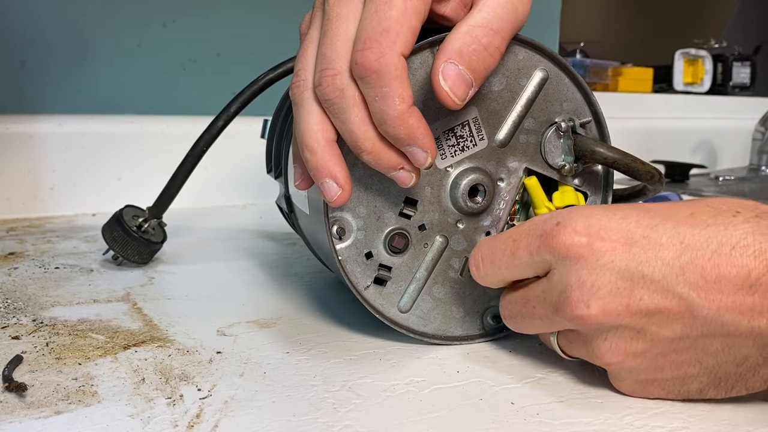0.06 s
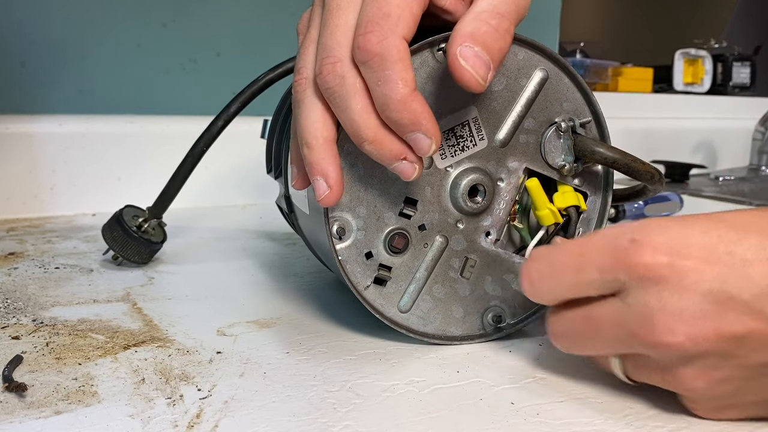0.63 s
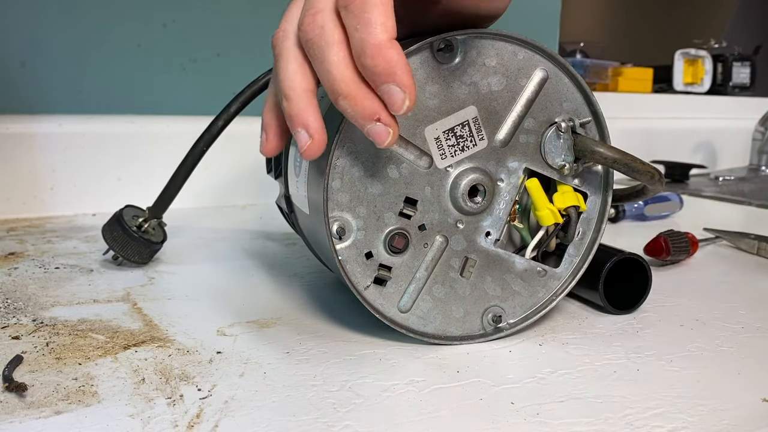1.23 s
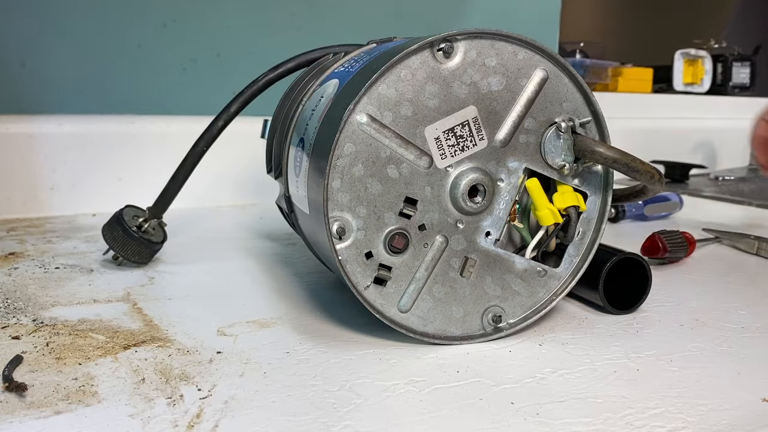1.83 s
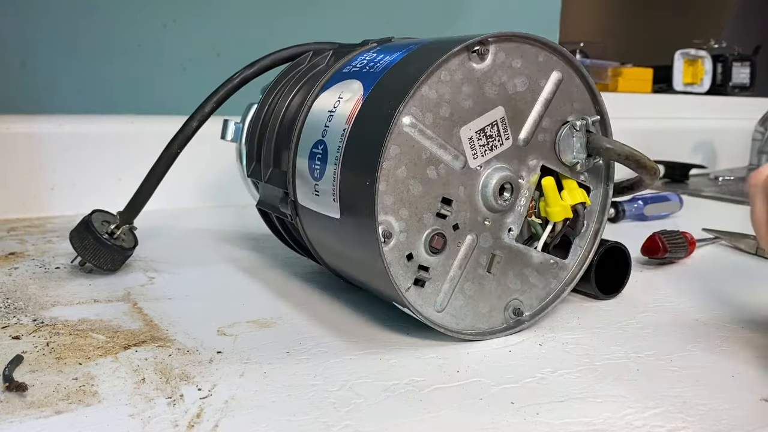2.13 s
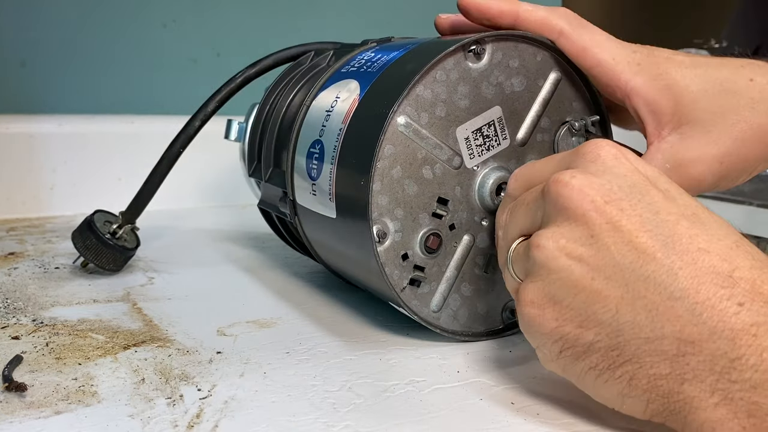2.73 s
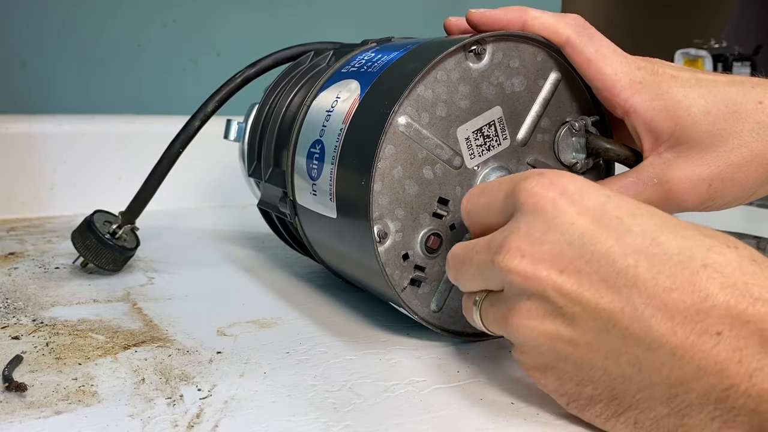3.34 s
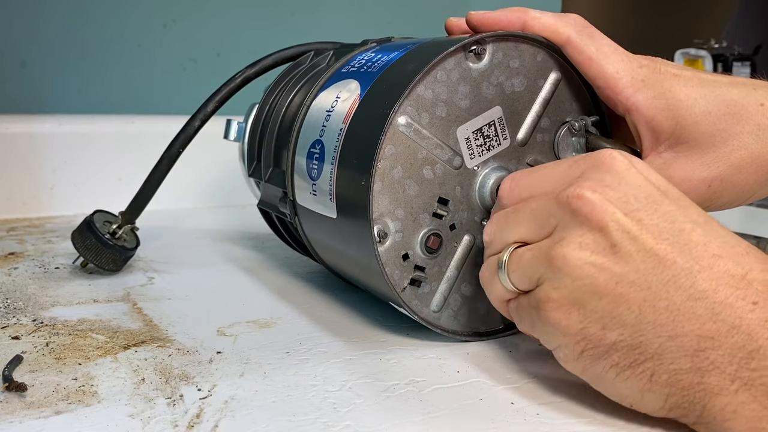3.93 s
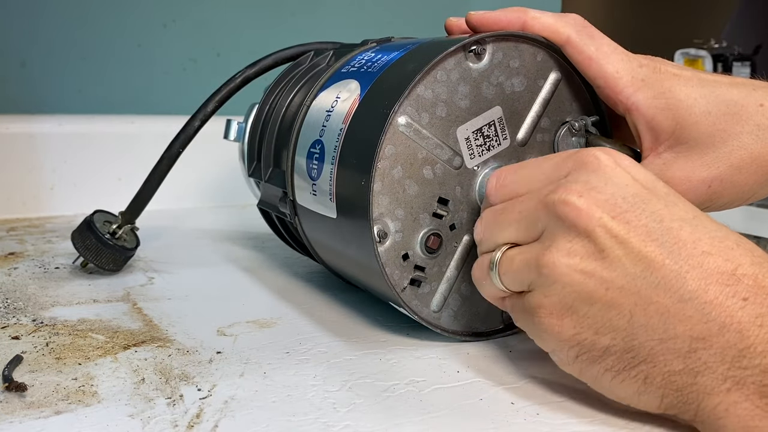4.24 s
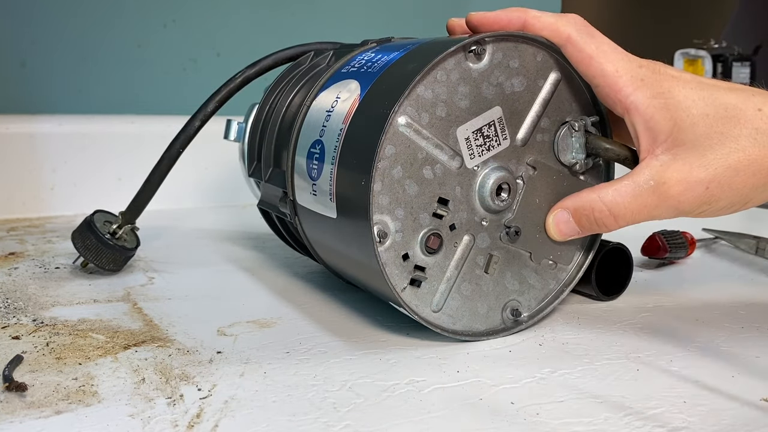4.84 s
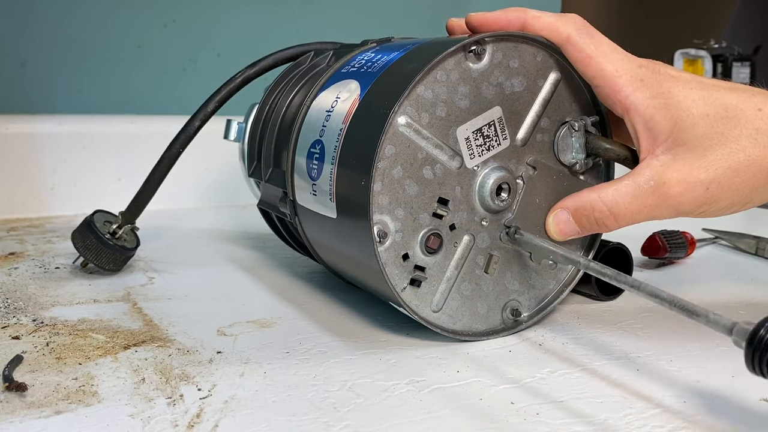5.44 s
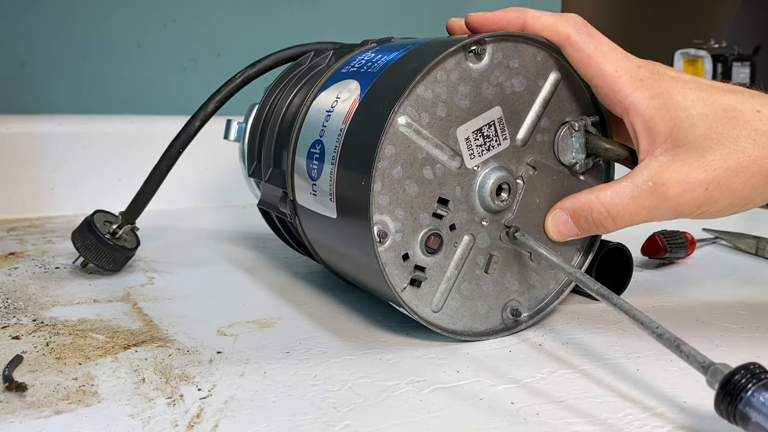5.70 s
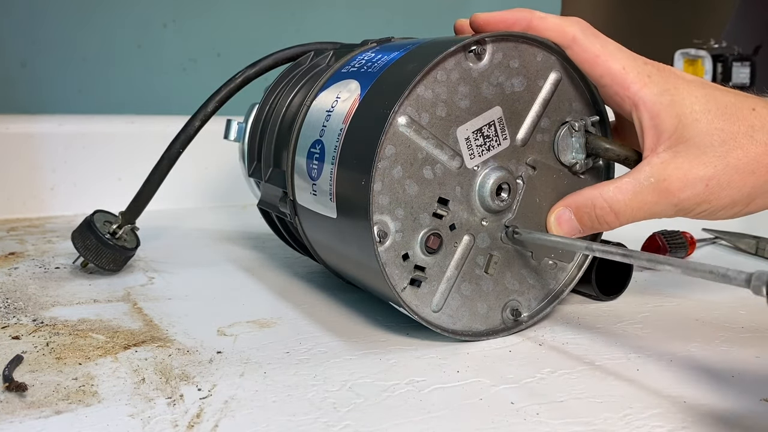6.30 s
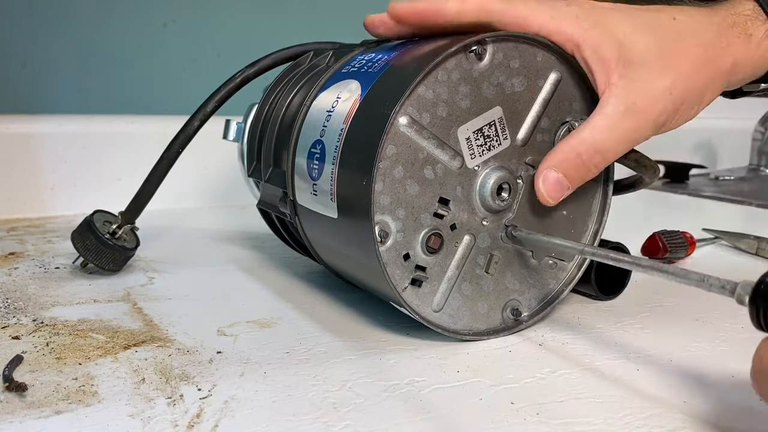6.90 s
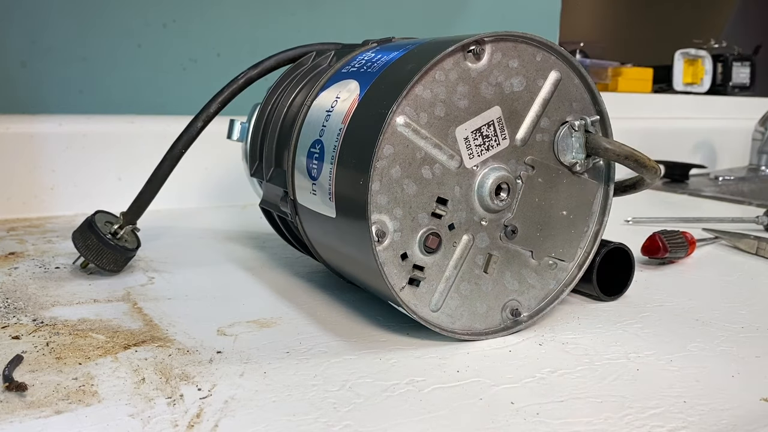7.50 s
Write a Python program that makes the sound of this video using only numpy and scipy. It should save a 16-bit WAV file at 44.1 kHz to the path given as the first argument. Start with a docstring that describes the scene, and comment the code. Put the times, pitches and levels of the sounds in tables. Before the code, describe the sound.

An electric motor knocks heavily on a countertop, then a small metal cover clicks on and a screwdriver ticks and scrapes.

```python
"""A countertop in a small room, a stereo microphone close to an electric motor lying on it.
Wires are pushed into the motor's end compartment; let go, it rocks with heavy knocks that boom in the
counter. A small sheet-metal cover is picked up, clicked into place and screwed down, ringing the end
plate. Off to the side, cover and screwdriver clatter. Behind it all lies a low rumble or a faint hum."""
import sys
import numpy as np
from scipy import signal
from scipy.fft import rfft, irfft
from scipy.io import wavfile
from scipy.ndimage import uniform_filter1d

SR = 44100
rng = np.random.default_rng(int(sys.argv[2]) if len(sys.argv) > 2 else 0)


def digitize_waveform(pressure):
    """Quantize a signal to 16-bit integers and store it at the path in sys.argv[1].

    Rows of a 2-D input are taken as channels; values are limited to [-1, 1].
    """
    field = np.atleast_2d(pressure).T
    bounded = np.clip(field, -1, 1)
    quanta = np.round(bounded * 32767).astype(np.int16)
    wavfile.write(sys.argv[1], SR, quanta)


N = 333396
RING_SAMPLES, ONSET_SAMPLES = int(.6 * SR), int(.03 * SR)
TIME, RING_TIME = np.arange(N) / SR, np.arange(RING_SAMPLES) / SR
LEFT_RIGHT = np.array([[1], [-1]])


def undb(db):
    """Decibels to gain."""
    return 10 ** (np.asarray(db) / 20)


def unit(x):
    """Scale to rms 1."""
    return x / np.sqrt(np.mean(x ** 2))


def fade(t60):
    """Exponential decay, 60 dB in t60 seconds."""
    return np.exp(-np.log(1000) * RING_TIME / max(t60, 1e-3))


def rise(build_s):
    """Onset that climbs towards 1 with time constant build_s."""
    return 1 - np.exp(-RING_TIME / build_s)


def gate(start_s, end_s, attack_s, release_s):
    """Envelope that swells from start_s, holds until end_s and dies away."""
    swell = 1 - np.exp(-np.maximum(TIME - start_s, 0) / attack_s)
    return swell * np.exp(-np.maximum(TIME - end_s, 0) / release_s)


def add(track, s, sound):
    """Mix a sound into the track at time s."""
    start = max(int(s * SR), 0)
    track[:, start:start + sound.shape[1]] += sound[:, :N - start]


def noise(colour, width, size=RING_SAMPLES, ripple_db=0):
    """Stereo noise with a (Hz, dB) spectrum, rippled by a struck object's many narrow resonances."""
    hz, db = np.transpose(colour)
    f = np.maximum(np.fft.rfftfreq(size, 1 / SR), 1)
    grid = np.geomspace(200, SR / 2, num=260)
    ripple = ripple_db * np.interp(f, grid, rng.standard_normal(len(grid)))
    spectrum = undb(np.interp(np.log(f), np.log(hz), db) + ripple)
    mid, side = rfft(rng.standard_normal((2, size))) * spectrum
    side = side * width * f ** 2 / (f ** 2 + 220 ** 2)  # long waves reach both capsules alike
    return unit(irfft(np.array([mid + side, mid - side]), size))


def ring(modes, detune, phase_spread, spot_db, t60_scale=1):
    """Struck modes; each blow lands on a new spot, and short waves reach the capsules out of phase."""
    out = 0
    for hz, db, t60 in modes:
        pitch, weight, skew = rng.standard_normal(3)
        skew = phase_spread * skew * hz / np.hypot(hz, 600)
        phase = 2 * np.pi * hz * (1 + detune * pitch) * RING_TIME + skew * LEFT_RIGHT
        gain = rng.choice([-1, 1]) * undb(db + spot_db * weight)
        out = out + gain * fade(t60 * t60_scale) * np.sin(phase)
    return out / np.sqrt(np.sum(undb(np.array(modes)[:, 1]) ** 2) / 2)


def radiate(x, lowest_hz):
    """An object gives off little sound at wavelengths much longer than itself."""
    return signal.sosfilt(signal.butter(2, lowest_hz, "high", fs=SR, output="sos"), x)


def set_bands(blow, edges_hz, levels_db):
    """Scale each band of a blow so that its first 30 ms have the given rms level."""
    out = 0
    for k, db in enumerate(levels_db):
        band = blow
        if k > 0:
            band = signal.sosfilt(signal.butter(4, edges_hz[k - 1], "high", fs=SR, output="sos"), band)
        if k < len(edges_hz):
            band = signal.sosfilt(signal.butter(4, edges_hz[k], fs=SR, output="sos"), band)
        out = out + band * undb(db) / np.sqrt(np.mean(band[:, :ONSET_SAMPLES] ** 2))
    return out


def reflect(x, db, t60, build_s):
    """Echoes of a sound from counter, housing and wall, different at each capsule."""
    echoes = rng.standard_normal((2, RING_SAMPLES)) * fade(t60) * rise(build_s)
    echoes = undb(db) * echoes / np.sqrt(np.sum(echoes ** 2) / 2)
    return signal.fftconvolve(x, echoes, axes=1)[:, :RING_SAMPLES]


def scatter(colour, db, t60, build_s):
    """The room's answer to a blow: a wide wash of noise that builds quickly and dies away."""
    return undb(db) * noise(colour, width=1, ripple_db=4) * fade(t60) * rise(build_s)


# spectrum of a low rumble: (frequency [Hz], level [dB])
RUMBLE_COLOUR = [(20, -0.5), (40, -32), (58, 9), (75, -4), (95, 6), (130, -8.5), (250, -9.5), (400, -16),
                 (800, -27), (2000, -65.5), (6000, -44), (16000, -56)]
def room_rumble():
    """Low room tone all around the microphone."""
    return undb(-50.5) * noise(RUMBLE_COLOUR, width=1, size=N)


# modes of the end plate, damped by the fingers: (frequency [Hz], level [dB], t60 [s])
PLATE_MODES = [(1150, 0, .02), (1275, 1, .022), (1465, -5, .018), (2410, -5, .018), (3080, -10, .018),
               (3830, -11, .02), (4860, -7, .02), (5060, -7, .032), (7520, -8, .03), (8100, -11, .025),
               (9600, -8, .025), (13500, -13, .018)]
# its dense upper modes: (frequency [Hz], level [dB])
PLATE_COLOUR = [(100, -17), (300, -4.5), (800, -7.5), (1300, -10), (2000, -4), (5000, 3.5), (6200, -2),
                (9500, -7), (11200, -7.5), (15000, -16)]
def plate_strike(levels_db, contact_t60, ring_db=-10.5, soft_s=.00028):
    """Metal meets the end plate close by: crack, brief ring, echoes. Levels are low, mid and high."""
    crack = noise(PLATE_COLOUR, width=.4, ripple_db=3) * fade(contact_t60)
    ring_gain = undb(ring_db) * min(contact_t60 / .012, 1) ** .5  # a brief contact rings less
    plate = ring_gain * ring(PLATE_MODES, detune=.025, phase_spread=.45, spot_db=2.5)
    direct = radiate((crack + plate) * rise(soft_s), lowest_hz=480)
    # small surfaces close by throw back mostly the short waves
    near = reflect(radiate(direct, lowest_hz=1500), db=-6, t60=.095, build_s=.003)
    far = reflect(direct, db=-26, t60=.45, build_s=.012)
    return set_bands(direct + near + far, edges_hz=[1900, 6500], levels_db=levels_db)


# a wire nut springing against the housing: (frequency [Hz], level [dB], t60 [s])
CLINK_MODES = [(1345, 0, .1), (1900, -7, .08), (2065, 0, .11), (2930, -8, .08), (3415, -7, .07)]
def wire_nut_clink():
    """A wire nut slips and sets the housing and the room ringing."""
    out = np.zeros((2, N))
    modes = ring(CLINK_MODES, detune=.002, phase_spread=.5, spot_db=1)
    housing = undb(-30) * radiate(modes, lowest_hz=500)
    tap = plate_strike([-37, -51, -74], contact_t60=.049, ring_db=-4.5)
    room = reflect(tap + housing / 2, db=-8, t60=.65, build_s=.0046)
    add(out, .0107, tap + housing + room)
    return out


# gritty slips of wire, cover and screw: (start [s], end [s], rate [1/s], level [dB])
GRIT_SPELLS = [(.04, .16, 34, -53.5), (2.36, 2.82, 15.4, -47), (3.38, 3.701, 42, -57),
               (3.78, 4.5, 21, -55.5), (5.68, 6.2, 70, -57), (6.2, 6.5, 36, -64), (6.5, 7.15, 24, -57.5)]
def grit():
    """Edges and threads catch and let go at random, each slip a tiny tick on the plate."""
    out = np.zeros((2, N))
    for start_s, end_s, rate, db in GRIT_SPELLS:
        slips = (rng.random(N) < rate / SR) * (TIME > start_s) * (TIME < end_s)
        slips = slips * undb(4.5 * rng.standard_normal(N).clip(-2, 2))
        tick = noise(PLATE_COLOUR, width=1, ripple_db=1.5) * fade(.014)
        tick = radiate(tick + reflect(tick, db=-4.5, t60=.089, build_s=.0023), lowest_hz=1990)
        out += undb(db) * signal.oaconvolve(slips[None], tick[:, :4 * ONSET_SAMPLES], axes=1)[:, :N]
    return out


def slipping(rate_hz, spread_db):
    """Gain that moves at random from one small slip to the next."""
    size = max(int(SR / rate_hz), 1)
    steps = undb(spread_db * rng.standard_normal(N // size + 1).clip(-2.3, 2.3))
    return unit(uniform_filter1d(steps.repeat(size), size=size)[:N])


# strokes of fingers, wires and housing: (start [s], end [s], rub level [dB], hiss level [dB])
STROKES = [(0.365, 0.385, -81, -63), (0.552, 0.723, -65.5, -51.5), (0.888, 1.004, -67.5, -60),
           (1.118, 1.245, -58, -87), (1.319, 1.443, -54, -60.5), (1.56, 2.102, -60.5, -72),
           (2.306, 2.477, -58, -58), (2.71, 2.83, -58, -70), (2.931, 3.02, -64, -68),
           (3.397, 3.588, -61, -62.5), (4.118, 4.345, -71, -65), (4.54, 4.657, -55, -58.5),
           (5.223, 5.255, -53.5, -90), (5.643, 5.83, -51.5, -64), (5.82, 6.16, -58.5, -59),
           (6.32, 6.48, -70, -83.5), (6.804, 7.03, -60.5, -64.5), (7.34, 7.378, -48, -51)]
def rubbing():
    """Skin, insulation and housing slide in tiny slips: each stroke is a dull rub and a fine hiss."""
    rub_gain, hiss_gain = undb(-71.5), undb(-85)  # hands never rest entirely
    for start_s, end_s, rub_db, hiss_db in STROKES:
        motion = gate(start_s, end_s, attack_s=.028, release_s=.025)
        rub_gain = rub_gain + undb(rub_db) * motion
        hiss_gain = hiss_gain + undb(hiss_db) * motion
    slips = slipping(rate_hz=900, spread_db=4.5) * slipping(rate_hz=120, spread_db=3.5)
    rub_colour = [(300, -30), (800, -7), (1300, 0), (2500, -5), (5000, -14), (8000, -24.5),
                  (16000, -57.5)]
    hiss_colour = [(1500, -27.5), (4500, 0), (7000, 2), (10000, 9), (12500, 0), (15500, 5.5)]
    rub = rub_gain * noise(rub_colour, width=.95, size=N)
    hiss = hiss_gain * noise(hiss_colour, width=.94, size=N)
    return slips * (rub + hiss)


# contacts on the end plate: (time [s], level [dB], brightness [dB], contact t60 [s])
PLATE_CLICKS = [(0.5233, -80, -22.5, .028), (2.3283, -38, 8, 0.002), (2.5799, -63.5, -2, 0.038),
                (2.6702, -62.5, 4, .055), (2.855, -40, -7, 0.0022), (2.8691, -28.5, -0.5, 0.0041),
                (2.924, -46.5, -8, 0.081), (2.929, -31.5, 3, 0.011), (3, -58, -3, 0.0094),
                (3.0832, -46.5, 4, 0.014), (3.0872, -46.5, -10.5, 0.0093), (3.1914, -53.5, -1.5, 0.047),
                (3.3961, -61.5, 0, 0.047), (3.4413, -54, -8, 0.05), (3.5229, -51, 0.5, 0.082),
                (3.5507, -54.5, 11.5, 0.02), (3.656, -66.5, -3.5, 0.043), (4.0518, -61, -1, 0.019),
                (4.8043, -58.5, -4, 0.086), (5.0672, -58.5, -5, 0.043), (5.2232, -54.5, -9.5, 0.072),
                (5.3147, -42, -3, 0.037), (5.3432, -39.5, -14, 0.0017), (5.53, -53.5, 0, 0.02),
                (5.7464, -50, -7.5, 0.023), (5.8023, -46.5, -4.5, 0.067), (5.873, -53.5, 2, 0.14),
                (5.9017, -52, -3, 0.15), (6.2036, -56.5, -7.5, 0.027), (6.5814, -47, -7.5, 0.023),
                (6.733, -46.5, -10.5, 0.0089), (6.7658, -53.5, -9, 0.055), (6.8365, -47, -7.5, 0.024)]
def clicks():
    """Cover, screw and screwdriver tip strike the plate; hard contacts tilt towards the treble."""
    out = np.zeros((2, N))
    for s, db, bright_db, contact_t60 in PLATE_CLICKS:
        add(out, s, plate_strike([db - 2 - bright_db, db, db - 1.5 + bright_db], contact_t60))
    return out


# modes of tools and cover lying loose: (frequency [Hz], level [dB], t60 [s])
TOOL_MODES = [(530, -6, .09), (590, -8, .08), (775, -1, .09), (895, 3, .085), (1005, -4, .08),
              (1505, -3, .09), (2030, -3, .1), (2079, -8, .17), (2390, -3, .1), (2461, -4, .09),
              (3100, -2, .08), (3500, -4, .07), (3861, -13.5, .26), (4281, -5, .1), (4799, -2, .09),
              (6622, -6, .09), (7442, -4, .1)]
# their dense upper modes: (frequency [Hz], level [dB])
TOOL_COLOUR = [(100, -25), (250, -9.5), (500, 3), (900, -8.5), (1250, -7.5), (2000, -4.5), (3200, -1),
               (7000, -15), (9500, -24.5), (15500, -30.5)]
# loose parts moved: (time [s], low [dB], mid [dB], high [dB], top [dB], chatter t60 [s])
TOOL_CLACKS = [(0.9966, -61, -50, -56, -81, 0.32), (1.1489, -80, -66, -98, -90, 0.92),
               (1.2177, -80, -56.5, -77, -79, 0.12), (2.099, -68, -42.5, -67, -49.5, 0.15),
               (2.108, -52, -33.5, -39, -55, 0.14), (4.649, -30.5, -19.5, -22, -49, 0.065),
               (4.6635, -27.5, -27, -22.5, -26, 0.12), (4.9991, -37, -32, -46.5, -59, 0.11),
               (5.1405, -51.5, -54, -76, -87, 0.13)]
def tool_clatter():
    """Tools and cover chatter and ring on the counter, off to the side of the microphone."""
    out = np.zeros((2, N))
    for s, *levels_db, t60 in TOOL_CLACKS:
        chatter = noise(TOOL_COLOUR, width=.8, ripple_db=4) * fade(t60)
        metal = undb(-2) * ring(TOOL_MODES, detune=.004, phase_spread=.9, spot_db=2)
        room = scatter(TOOL_COLOUR, db=-16.5, t60=.2, build_s=.01)
        clack = radiate(chatter + metal + room, lowest_hz=342)
        add(out, s, set_bands(clack, edges_hz=[1100, 4200, 8500], levels_db=levels_db))
    return out


# modes of the countertop loaded by the motor: (frequency [Hz], level [dB], t60 [s])
COUNTER_MODES = [(73, -7.5, 0.38), (102, -13, 0.16), (141.3, 1, 0.21), (236.7, -3, 0.25),
                 (301.6, -8.5, 0.31), (385, 0.5, 0.19), (384, -3, 0.14), (445, -6, 0.47), (531.3, -5, 0.34),
                 (656.5, -6.5, 0.33), (867, -9.5, 0.3), (1082, -3, 0.45), (1182, -9, 0.73),
                 (1300, 5.5, 0.16), (1668, -2, 0.21), (2660, -11, 0.12), (3230, -19, 0.049)]
# its dense upper modes: (frequency [Hz], level [dB])
COUNTER_COLOUR = [(25, -12.5), (60, -2.5), (140, 5), (400, 0.5), (800, 2), (1400, 1.5), (2200, -13),
                  (2900, -21), (4300, -23.5), (5600, -20.5), (8000, -31.5), (11000, -32), (15500, -48.5)]
# the motor rocking: (time [s], level [dB], boom above that level [dB], nominal t60 [s])
MOTOR_KNOCKS = [(1.342, -29.5, -6, 0.48), (1.368, -37, 6, 0.4), (1.413, -39.5, -10, 0.13),
                (1.455, -20.5, -2.5, 0.35), (1.509, -21, -7.5, 0.28), (1.531, -20.5, 1, 0.38),
                (1.577, -21.5, -20, 0.26), (2.002, -44, 2.5, 0.35), (2.271, -33, -26.5, 0.11),
                (2.29, -27.5, -18, 0.088), (2.674, -49.5, 3, .088), (5.693, -46, -11, 0.095),
                (5.772, -34, -25, 0.076), (6.745, -43.5, -0.5, .08), (6.915, -48.5, 5.5, 0.073),
                (7.376, -46, -4.5, 0.16)]
def motor_knocks():
    """The heavy motor drops on its rim close by: a crack, the counter booms, the housing rattles."""
    hard_knock_db, rattle_growth, held_rattle_db = -17.5, .28, -7.5
    out = np.zeros((2, N))
    for s, db, boom_db, t60 in MOTOR_KNOCKS:
        # a free drop is hard and shakes the whole counter, a held one is soft and sounds from one spot
        freedom = min(t60 / .2, 1)
        rim = noise(COUNTER_COLOUR, width=.6, ripple_db=4) * fade(.03)
        crack = undb(8) * freedom ** 2 * radiate(rim, lowest_hz=900)
        rattle = noise(COUNTER_COLOUR, width=1.1 * freedom, ripple_db=3.5) * fade(t60 * .8)
        counter = undb(-4) * ring(COUNTER_MODES, detune=.0047, phase_spread=.9 * freedom,
                                  spot_db=3, t60_scale=t60 / .24)
        room = scatter(COUNTER_COLOUR, db=-11.5, t60=t60 * 2.27, build_s=.0065)
        blow = (crack + rattle + counter + room) * rise(.0012)
        blow = radiate(blow, lowest_hz=17 / t60)  # brief contacts move no deep bass
        # the rattle grows faster than the knock, and a firm hand stills it
        rattle_db = db - 1.5 + rattle_growth * (db - hard_knock_db) + held_rattle_db * (1 - freedom)
        levels_db = [db + boom_db, db, rattle_db, rattle_db - 9.5]
        add(out, s, set_bands(blow, edges_hz=[260, 800, 2500], levels_db=levels_db))
    return out * undb(1.2 * LEFT_RIGHT)  # a little left of centre


def motor_roll():
    """The motor rolls a little on its side and the counter rumbles."""
    motion = gate(start_s=1.957, end_s=2.1, attack_s=.034, release_s=.0092)
    return undb(-38) * motion * noise(RUMBLE_COLOUR, width=.88, size=N)


# air noise of the hum: (frequency [Hz], level [dB])
HUM_COLOUR = [(30, -48.5), (62, -44), (100, -12.5), (180, -7), (235, 0.5), (320, -2.5), (430, -4.5),
              (560, -7.5), (790, -14), (1000, -12), (2300, -26.5), (4000, -45), (10000, -44.5),
              (16000, -69)]
# its tones: (frequency [Hz], level against the air noise [dB])
HUM_TONES = [(107.7, -21), (236.9, -6.5), (387.6, -7), (473.7, -14), (985, -16)]
# its course, dipping briefly after the loudest clatter: (time [s], level [dB])
HUM_LEVEL = [(2.1, -55), (4.6, -53.5), (4.88, -62.5), (5.1, -55), (6.2, -52), (7.45, -52)]
def room_hum():
    """A faint fan-like hum in the background: air noise and a few wavering tones."""
    hum = noise(HUM_COLOUR, width=.52, size=N)
    for hz, db in HUM_TONES:
        waver = np.cumsum(rng.standard_normal(N)) * .01418
        hum = hum + undb(db) * np.sqrt(2) * np.sin(2 * np.pi * hz * TIME + waver)
    times_s, levels_db = np.transpose(HUM_LEVEL)
    return undb(np.interp(TIME, times_s, levels_db)) * hum


# very high, brief rings: (time [s], pitch [Hz], level [dB])
HIGH_RINGS = [(2.329, 13900, -20.5), (6.752, 13100, -36)]
def high_rings():
    """A very high, thin tone rings briefly, the first with the sharp click at 2.33 s."""
    out = np.zeros((2, N))
    for s, hz, db in HIGH_RINGS:
        narrow_band = [(hz * .85, -45), (hz * .96, -8), (hz, 0), (hz * 1.04, -8), (hz * 1.15, -45)]
        add(out, s, undb(db) * noise(narrow_band, width=.8) * fade(t60=.04))
    return out


# edges catching: (time [s], level [dB])
EDGE_CATCHES = [(2.4324, -46), (2.4561, -48), (2.466, -38), (2.4987, -39.5), (2.8036, -46), (5.4933, -54),
                (6.0171, -46), (6.2986, -55.5), (6.6428, -43), (6.8985, -55.5)]
def edge_catches():
    """An edge of cover or screw catches and lets go with a thin tick."""
    out = np.zeros((2, N))
    for s, db in EDGE_CATCHES:
        add(out, s, plate_strike([db - 16, db - 3, db - 11.5], contact_t60=.029))
    return out


# the screwdriver tip rocking: (time [s], level [dB])
TIP_PINGS = [(6.103, -50.5), (6.12, -52), (6.3602, -60), (6.5236, -54.5), (6.7032, -52.5), (6.7371, -37.5),
             (6.953, -48.5), (7.0592, -46.5), (7.1495, -47), (7.238, -58.5)]
def screwdriver_pings():
    """The tip rocks in the screw head; the soft contact draws a dull ping from the plate."""
    out = np.zeros((2, N))
    for s, db in TIP_PINGS:
        add(out, s, plate_strike([db + 1, db - 20, db - 35], contact_t60=.01, ring_db=-8, soft_s=.003))
    return out


def scene():
    """Handling in the foreground; behind it the rumble gives way to the hum, then returns."""
    humming = gate(start_s=2.11, end_s=7.465, attack_s=.0061, release_s=.0061)
    background = (1 - humming) * room_rumble() + humming * room_hum()
    handling = wire_nut_clink() + grit() + rubbing() + clicks() + tool_clatter()
    motor = motor_knocks() + motor_roll()
    fastening = high_rings() + edge_catches() + screwdriver_pings()
    return background + handling + motor + fastening


def record(dry):
    """The recorder behind the microphone cuts the top steeply."""
    top_hz = 16200
    return signal.sosfilt(signal.ellip(8, .2, 70, top_hz, fs=SR, output="sos"), dry)


dry = scene()
out = record(dry)
digitize_waveform(out)
```